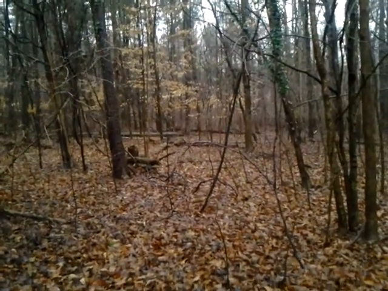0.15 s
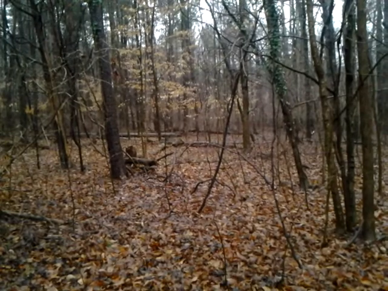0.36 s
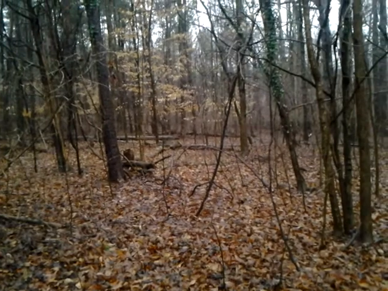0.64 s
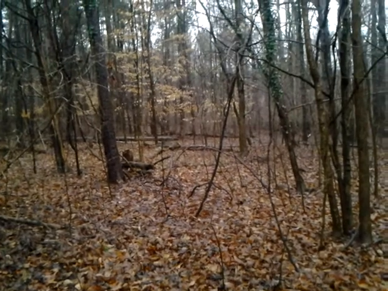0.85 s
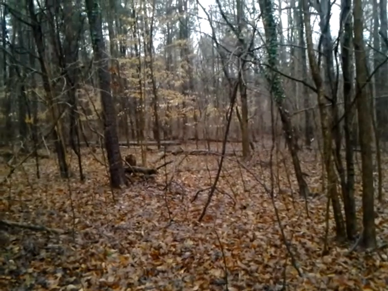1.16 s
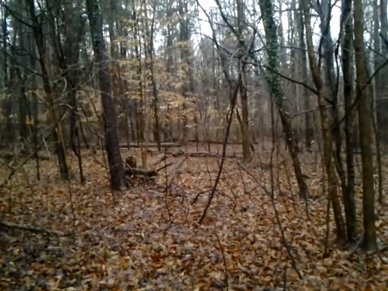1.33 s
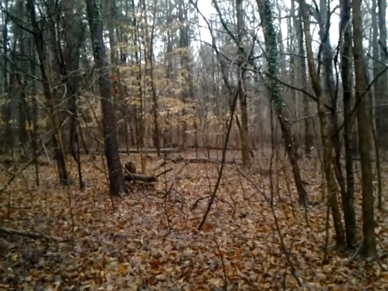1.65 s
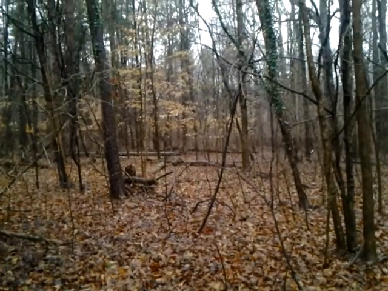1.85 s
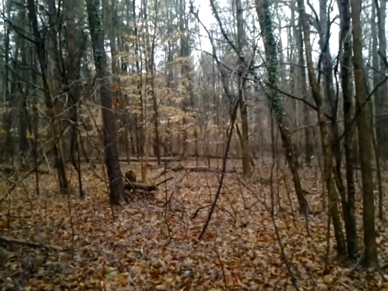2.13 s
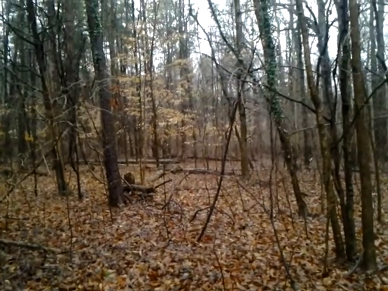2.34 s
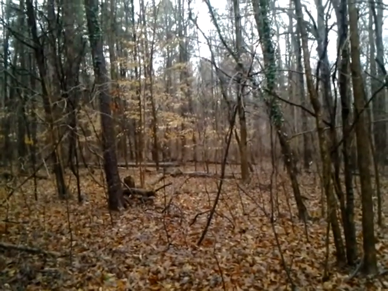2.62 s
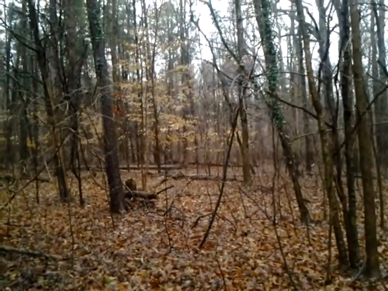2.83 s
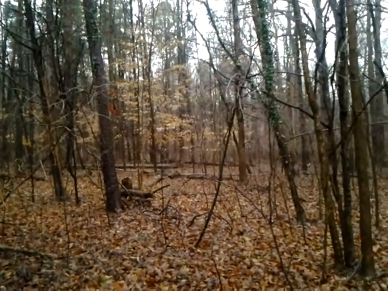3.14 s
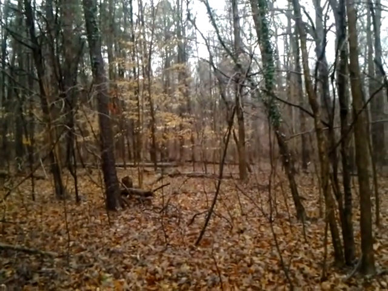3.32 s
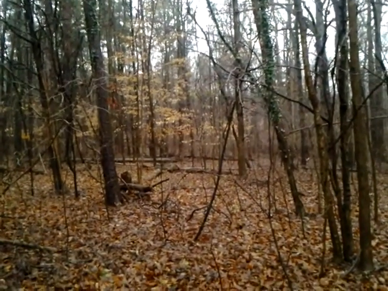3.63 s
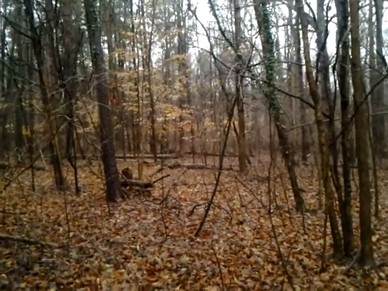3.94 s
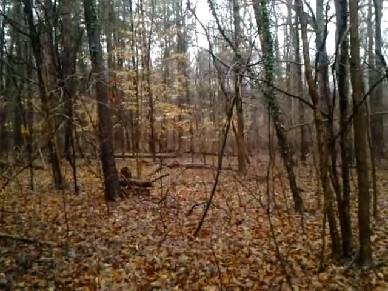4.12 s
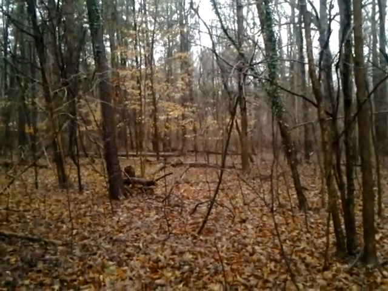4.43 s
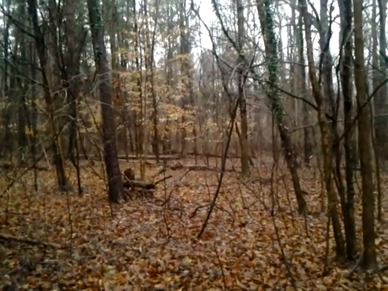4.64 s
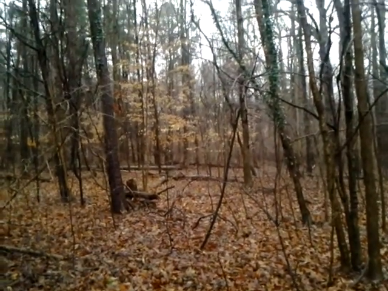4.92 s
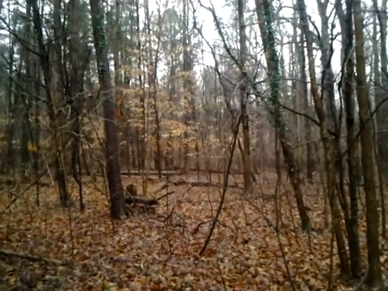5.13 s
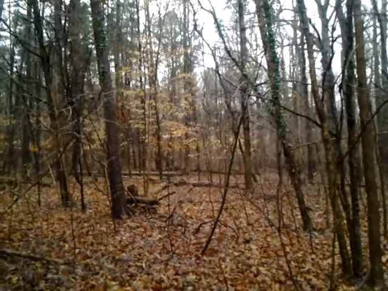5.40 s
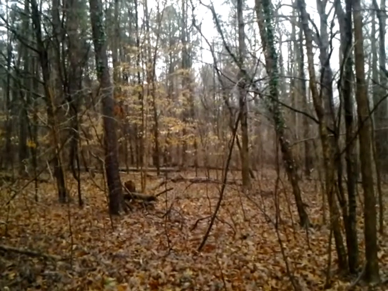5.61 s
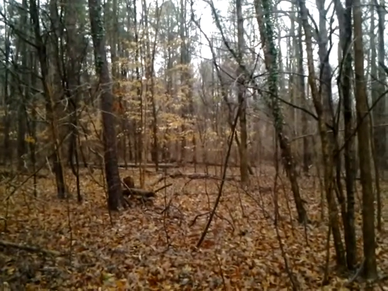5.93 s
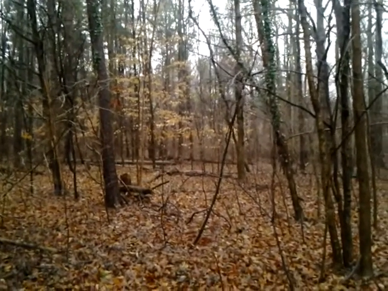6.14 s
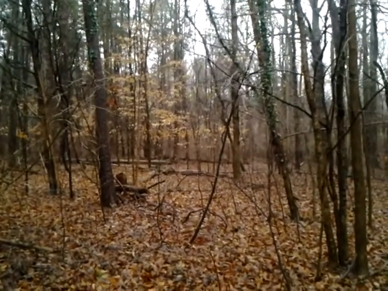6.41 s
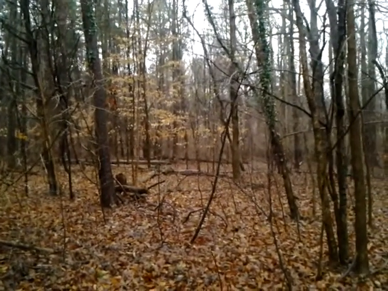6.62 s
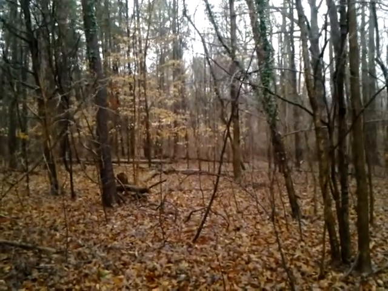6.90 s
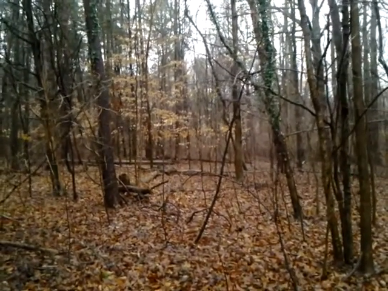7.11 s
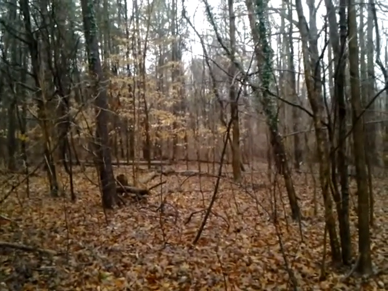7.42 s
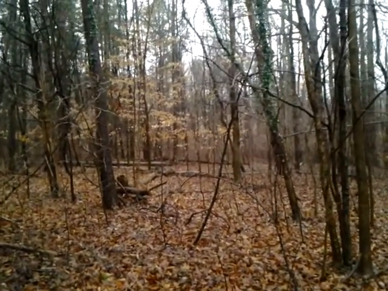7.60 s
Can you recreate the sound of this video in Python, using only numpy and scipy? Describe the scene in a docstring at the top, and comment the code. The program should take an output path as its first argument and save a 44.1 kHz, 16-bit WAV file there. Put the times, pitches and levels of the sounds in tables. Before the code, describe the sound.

Heard from a still position among trees, nearby crows trade rasping caws over a more distant flock, each call trailing a long echo. The calling is busy at first, eases after a soft bird whistle and a short leaf rustle, then returns with a run of clipped caws. Scattered drips tap the fallen leaves, and a faint rumble and hiss of air continue behind everything.

```python
"""An autumn wood, where a flock of crows calls from the trees. Each short, hoarse caw rises and falls
in pitch and is shaped by the bird's throat and beak. Trunks scatter the caws into a long echo, and
more birds answer from farther off. Drops tick on dry leaves, a small bird whistles once and leaves
rustle briefly. A low rumble and a thin hiss lie under it all."""
import sys
import numpy as np
from scipy import signal
from scipy.fft import rfft, irfft, next_fast_len
from scipy.io import wavfile
from scipy.ndimage import uniform_filter1d

SR = 44100
rng = np.random.default_rng(int(sys.argv[2]) if len(sys.argv) > 2 else 0)


def int16_out(signal):
    """Quantize to a 16-bit WAV file."""
    q = np.round(np.clip(np.atleast_2d(signal).T, -1, 1) * 32767)
    wavfile.write(sys.argv[1], SR, q.astype(np.int16))


N = 342216


def amp(db):
    """Turns decibels into a number to multiply a sound by."""
    return 10 ** (np.asarray(db) / 20)


def unit_level(x):
    """Scales a sound to an average (rms) level of 1."""
    return x / np.sqrt(np.mean(x ** 2) + 1e-20)


def curve_at(points, hz):
    """Looks up values between the rows of a (frequency, value) table, on a log-frequency axis."""
    row_hz, value = np.transpose(points)
    return np.interp(np.log(hz + 1), np.log(row_hz + 1), value)


def coloured(x, points):
    """Filters a sound by a table of (frequency [Hz], gain [dB])."""
    size = next_fast_len(len(x))
    gain = amp(curve_at(points, np.fft.rfftfreq(size, 1 / SR)))
    return irfft(rfft(x, size) * gain, size)[:len(x)]


def add(mix, start_s, sound):
    """Mixes a sound in, cutting off whatever does not fit."""
    start = round(start_s * SR)
    sound = sound[max(-start, 0):]
    part = mix[max(start, 0):][:len(sound)]
    part += sound[:len(part)]


def wobble(t, rate):
    """Glides to a new random value rate times a second."""
    return np.interp((t - t[0]) * rate, np.arange(512), rng.standard_normal(512))


def hump(middle_s, half_length_s, order=2):
    """A smooth rise to 1 and back; a higher order gives a flatter top."""
    return np.exp(-abs((np.arange(N) / SR - middle_s) / half_length_s) ** order)


def air(rumble_db=-54, swell_db=-60.5, hiss_db=-62):
    """A distant rumble, a low murmur of air that swells once, and a thin hiss."""
    # the tone of each of the three noises: (frequency [Hz], gain [dB])
    rumble_colour = [(10, -23.5), (25, -5), (55, 0), (80, -3), (100, -7.5), (118, -6.5), (160, -14),
                     (220, -17), (290, -17), (480, -19.5), (850, -19.5), (1200, -23), (2500, -27.5),
                     (6000, -72.5)]
    swell_colour = [(60, -43), (115, 7.5), (160, -24.5), (220, -9), (290, -4), (400, -17), (1000, -40),
                    (4000, -79)]
    hiss_colour = [(200, -7.5), (2000, 3.5), (4000, -0.5), (7000, 0.5), (10000, -4), (16000, -3.5)]
    low, mid, high = rng.standard_normal((3, N))
    rumble = amp(rumble_db) * unit_level(coloured(low, rumble_colour))
    swell = amp(swell_db) * unit_level(coloured(mid, swell_colour))
    hiss = amp(hiss_db) * unit_level(coloured(high, hiss_colour))
    return rumble + swell * hump(middle_s=3.62, half_length_s=2.07) + hiss


def caw(pitch_hz, width, length, bright_db, rough, nasal_db, voice,
        rise_s=.044, fall_s=.069, onset_s=.043, attack_s=.0088, tight_s=.07, end_s=.07,
        nasal_hz=2080, nasal_width_hz=190, beak_open_s=.03, beak_shut_s=.058):
    """A buzz with puffs of breath, arching in pitch, through a throat from deep (voice -1) to high (1)."""
    # how throats of three sizes shape the voice: (frequency [Hz], gain [dB])
    deep_throat = [(400, -28), (720, -15), (1050, -15), (1300, 2), (1500, 1), (1650, -7), (2020, -19.5),
                   (2250, -21), (2550, -52), (3100, -20.5), (4150, -24), (5800, -18.5), (8300, -22.5),
                   (12000, -31)]
    middle_throat = [(400, -18.5), (750, -17), (1050, -9), (1330, -0.5), (1620, 2), (1880, -10.5),
                     (2300, -10.5), (2700, -23), (3800, -14), (4200, -18.5), (4600, -18), (6500, -16.5),
                     (8000, -30.5), (12000, -28)]
    high_throat = [(400, -26), (800, -16.5), (1100, -25), (1400, 0.5), (1710, 1.5), (1920, -41.5),
                   (2450, -15.5), (2750, -27), (3400, -10), (3750, -16.5), (5500, -22.5), (6750, -14),
                   (8000, -28.5), (12000, -45)]
    # what tightening the throat changes: (frequency [Hz], gain [dB])
    tight_throat = [(700, 1), (1300, -5), (1800, 4.5), (2300, 1.5), (4000, 1)]
    t = np.arange(-4608, 4608) / SR  # the pitch is highest at t = 0
    arch = 1 / np.sqrt(1 + (t / (width * np.where(t < 0, rise_s, fall_s))) ** 2)
    rough = np.clip(rough, 0, .9)
    # uneven cycles blur the upper harmonics far more than the strong second one
    jitter = (.005 + .048 * rough) * wobble(t, 600) + .004 * wobble(t, 90)
    cycles = np.cumsum(pitch_hz * arch * (1 + jitter)) / SR
    buzz = sum(np.cos(2 * np.pi * k * cycles) * amp(min(k - 1, 4.5) * wobble(t, 70))
               for k in range(1, 15))
    buzz *= 1 + .7 * np.sqrt(rough) * wobble(t, 420)
    puffs = (.16 + np.exp(-(cycles % 1) / .31)) * rng.standard_normal(len(t))
    puffs = coloured(puffs, [(1500, -8), (5000, 0), (9000, 0), (14000, -10)])
    cry = np.sqrt(1 - rough) * unit_level(buzz) + np.sqrt(rough + .1) * unit_level(puffs)
    # the voice starts with a hard push through a tight throat and dies as the pitch falls
    age = np.maximum(t + onset_s * np.sqrt(width * length), 0)
    tight = np.exp(-(age / tight_s) ** 2)
    fade = np.exp(-(np.maximum(t, 0) / (end_s * length)) ** 3.2)
    effort = np.minimum(age / attack_s, 1) * (1 + .22 * tight) * fade
    cry = effort * (cry + tight * (coloured(cry, tight_throat) - cry))
    hz = np.fft.rfftfreq(len(t), 1 / SR)
    deep, high = np.clip([-voice, voice], 0, 1)
    throat_db = deep * curve_at(deep_throat, hz) + high * curve_at(high_throat, hz)
    throat_db += (1 - deep - high) * curve_at(middle_throat, hz)
    throat_db += bright_db * np.clip((hz - 1900) / 1500, 0, 1)
    throat_db += nasal_db * np.exp(-((hz - nasal_hz) / nasal_width_hz) ** 2)
    # treble comes out only while the beak is wide open; it snaps open and shuts more slowly
    beak = np.exp(-np.where(t < 0, (t / beak_open_s) ** 8, abs(t / beak_shut_s) ** 3))
    treble = np.clip((hz - 2400) / 700, 0, 1)
    spectrum = rfft(cry) * (1 - treble) + rfft(cry * beak) * treble
    return unit_level(irfft(spectrum * amp(throat_db))) * np.sqrt(np.mean(effort ** 2))


def near_crows(middle_pitch_hz=788.5, throat_step_hz=74.5):
    """Crows in the nearest trees. Returns the sound that comes straight and the sound that will echo."""
    # the caws: (time of top pitch [s], top pitch [Hz], relative level [dB], kind)
    caws = [(.082, 725, -50, "nasal"), (.119, 785, -43, "hoarse"), (.333, 782, -54, "drawn"),
            (.433, 792, -48, "hoarse"), (.558, 772, -48, "hoarse"), (.636, 726, -49, "dull"),
            (.706, 757, -48.5, "dull"), (.806, 788, -48.5, "hoarse"), (.986, 755, -48.5, "hoarse"),
            (1.18, 787.4, -46.5, "hoarse"), (1.206, 773, -53, "dull"), (1.471, 741, -48.5, "hoarse"),
            (1.62, 794, -49, "hoarse"), (1.682, 740.7, -47.5, "dull"), (1.868, 857, -48, "ringing"),
            (1.922, 803, -49.5, "hoarse"), (2.074, 838, -47, "ringing"), (2.182, 800, -53, "drawn"),
            (2.25, 856, -48, "ringing"), (2.472, 794, -52.5, "clipped"), (2.668, 860, -47, "ringing"),
            (2.849, 794, -46.5, "hoarse"), (3.14, 799, -48, "clipped"), (3.165, 852, -50.5, "ringing"),
            (3.194, 762, -50, "drawn"), (3.516, 781, -49, "clear"), (3.636, 858, -47, "ringing"),
            (3.66, 759, -47.5, "hoarse"), (3.766, 778, -57, "drawn"), (4.071, 784, -48.5, "clear"),
            (4.265, 833.5, -47.5, "ringing"), (4.852, 768.5, -49.5, "clear"), (4.996, 754, -46.5, "hoarse"),
            (5.02, 717, -54, "dull"), (5.628, 798, -51, "clear"), (6.441, 784, -53.5, "clear"),
            (6.623, 771.6, -47, "clipped"), (6.901, 738.6, -49.5, "clipped"),
            (7.179, 743, -44.5, "clipped"), (7.306, 736, -49, "clipped"), (7.4, 746, -45.5, "clipped"),
            (7.466, 717, -50.5, "drawn"), (7.536, 727, -52, "drawn")]
    # each kind of caw: (straight-path gain [dB], lower behind trunks; arch width [factor],
    # length [factor], brightness [dB], roughness [below 0 counts as 0], nasal tone [dB])
    kinds = {"ringing": (0.9, 1.53, 1.14, -1, -0.04, -8), "clear": (-1, 1.3, 1.24, -4, -0.1, 0),
             "hoarse": (-0.5, 1, 1.21, -3, 0.24, -3.5), "clipped": (-1.7, 1.05, 1.18, -2.1, 0.2, 2.5),
             "drawn": (2.5, 1.83, .9, -2.5, 0.48, 3), "dull": (-1.5, 1.9, 0.94, -10, -0.2, 3),
             "nasal": (1.5, 2, 1.8, 0, -0.6, 23.5)}
    direct, into_wood = np.zeros((2, N))
    for time_s, pitch_hz, level_db, kind in caws:
        direct_db, *shape = kinds[kind]
        voice = (pitch_hz - middle_pitch_hz) / throat_step_hz  # higher birds have smaller throats
        call = amp(level_db) * caw(pitch_hz, *shape, voice)
        start_s = time_s - len(call) / 2 / SR
        add(direct, start_s, amp(direct_db) * call)
        add(into_wood, start_s, call)
    return direct, into_wood


def trunk_echoes(x, echoes_per_s=1500):
    """Sound bounces off trunks: strongly off the near ones, then in a tail whose treble dies first."""
    # how long the wood rings: (frequency [Hz], time to fade by 60 dB [s])
    ring_times = [(300, 1.2), (1500, 1.84), (3000, 1.76), (6500, 1.22), (12000, 0.12)]
    # trunks and twigs scatter treble best: (frequency [Hz], gain [dB])
    scatter = [(300, -4), (1450, -1.5), (2100, 0), (3500, 2), (6500, 2), (12000, -3)]
    bounces = rng.standard_normal(2 * SR) * (rng.random(2 * SR) < echoes_per_s / SR)
    hz, t, bands = signal.stft(bounces, SR, nperseg=256)
    decay_db = -60 * t / curve_at(ring_times, hz)[:, None] + 6 * np.exp(-t / .05)
    fade_in = np.minimum(t / .0089, 1)
    tail = signal.istft(bands * amp(decay_db) * fade_in, SR, nperseg=256)[1]
    return coloured(signal.fftconvolve(x, tail / np.linalg.norm(tail))[:N], scatter)


def far_crows(count=56, pitch_hz=750, level_db=-51.5, fade_db_per_s=.93):
    """More birds answer at random from deeper in the wood, slowly getting quieter."""
    # the tone of the far birds: (frequency [Hz], gain [dB])
    far_colour = [(300, 10), (800, 1), (1450, 4), (1800, 2), (3000, 3.5), (6500, -1.5), (12000, -18)]
    # two lulls in the calling: (middle [s], half length [s], depth [dB])
    lulls = [(4.674, 0.13, 7), (5.982, 0.7, 10.5)]
    birds = [caw(pitch_hz * (1.06 - .12 * size), width=.9 + .4 * stretch, length=.88,
                 bright_db=-3, rough=.18, nasal_db=0, voice=-.5 * size)
             for size, stretch in rng.random(size=(24, 2))]
    flock = np.zeros(N)
    for k, offset in enumerate(rng.random(count)):
        call = birds[k % len(birds)]
        add(flock, (k + offset) / count * N / SR - len(call) / 2 / SR, call)
    flock = coloured(flock + 2 * trunk_echoes(flock), far_colour)
    lull_db = sum(depth_db * hump(middle_s, half_s, order=4) for middle_s, half_s, depth_db in lulls)
    return unit_level(flock) * amp(level_db - fade_db_per_s * np.arange(N) / SR - lull_db)


def drop(ring_hz, ring_cycles=1.5, thud_hz=800):
    """A drop flicks a leaf: a few cycles of ringing, a tiny snap and a soft thud."""
    t = np.arange(-256, 256) / SR
    ring_s = ring_cycles / ring_hz * np.where(t < 0, .6, .9)  # rises faster than it fades
    ring = np.exp(1 - np.sqrt(1 + (t / ring_s) ** 2)) * np.sin(2 * np.pi * ring_hz * t)
    snap = .13 * rng.standard_normal(len(t)) * np.exp(-abs(t) / .00089)
    thud = .35 * np.exp(-(t / .00078) ** 2) * np.sin(2 * np.pi * thud_hz * t)
    return ring + snap + thud


def drips(faint_count=45, faint_db=-57):
    """Drops fall from the branches onto dry leaves, a few near and many faint."""
    # the near drops: (time [s], level [dB], ring pitch [Hz])
    near = [(.346, -48, 5500), (.613, -48, 3120), (1.135, -38.5, 2370), (1.202, -46, 3200),
            (1.931, -44, 2750), (2.016, -46, 2480), (2.5914, -32.5, 2060), (3.372, -43, 2644),
            (4.596, -45.5, 8950), (4.598, -47, 2700), (4.717, -44.5, 8800), (4.719, -38, 5350),
            (5.105, -47, 2720), (5.575, -46, 2740), (6.004, -50.5, 3340), (6.638, -40, 3150),
            (7.406, -37.5, 3100)]
    faint = [(when * N / SR, faint_db + 7 * strength, 2400 + 5000 * pitch ** 2)
             for when, strength, pitch in rng.random((faint_count, 3))]
    ticks = np.zeros(N)
    for time_s, level_db, ring_hz in near + faint:
        tick = amp(level_db) * drop(ring_hz)
        add(ticks, time_s - len(tick) / 2 / SR, tick)
    return ticks


def bird_whistle(peak_s=4.32, top_hz=2820, level_db=-57.5, rise_s=.0315, scoop_hz=167,
                 sag_hz_per_s=2200, fade_db_per_s=103):
    """A small bird's slightly hoarse note slides up, then sags as it fades."""
    t = np.arange(N) / SR - peak_s
    rise = np.clip(1 + t / rise_s, 0, 1)
    after_s = np.clip(t, 0, 1)
    hz = top_hz - scoop_hz * (1 - rise) ** 2 - sag_hz_per_s * after_s
    level = rise * amp(level_db - fade_db_per_s * after_s)
    jitter = .018 * unit_level(uniform_filter1d(rng.standard_normal(N), 80))
    return level * np.sin(2 * np.pi * np.cumsum(hz * (1 + jitter)) / SR)


def leaf_rustle(cracks_per_s=2500):
    """Dry leaves rub together in short bursts of tiny cracks."""
    # the rustles: (start [s], length [s], level [dB])
    bursts = [(4.748, 0.058, -60), (4.815, 0.072, -57.5), (5.25, 0.036, -67)]
    # the tone of dry leaves: (frequency [Hz], gain [dB])
    leaf_colour = [(2000, -35), (3900, -9), (4600, -1), (6200, -2), (7500, -15), (14000, -18)]
    cracks = rng.standard_normal(N) * (rng.random(N) < cracks_per_s / SR)
    t = np.arange(N) / SR
    level = sum(amp(db) * np.exp(-(2 * (t - start) / length - 1) ** 4) for start, length, db in bursts)
    return level * unit_level(coloured(cracks, leaf_colour))


def scene():
    """Birds, drops and their echoes over the leaves and air, all heard from the centre."""
    crows, into_wood = near_crows()
    bird = bird_whistle()
    ticks = drips()
    echoes = trunk_echoes(amp(-7.2) * into_wood + amp(-3) * bird + amp(-8) * ticks)
    mono = amp(-2.5) * crows + bird + ticks + echoes + far_crows() + leaf_rustle() + air()
    return np.array([mono, mono])


def record(dry, side_db=-78, cutoff_hz=15800):
    """Adds a faint hiss, opposite in left and right, then cuts the highest treble."""
    # the tone of that hiss: (frequency [Hz], gain [dB])
    side_colour = [(100, -10), (1800, -24), (2800, 1.5), (4000, 27), (6000, 9.5), (9000, -1), (12000, 6),
                   (14000, 7)]
    side = amp(side_db) * unit_level(coloured(rng.standard_normal(N), side_colour))
    low_pass = signal.firwin(511, cutoff_hz, window=("kaiser", 9), fs=SR)
    return signal.oaconvolve(dry + np.array([side, -side]), low_pass[None], "same")


dry = scene()
out = record(dry)
int16_out(out)
```